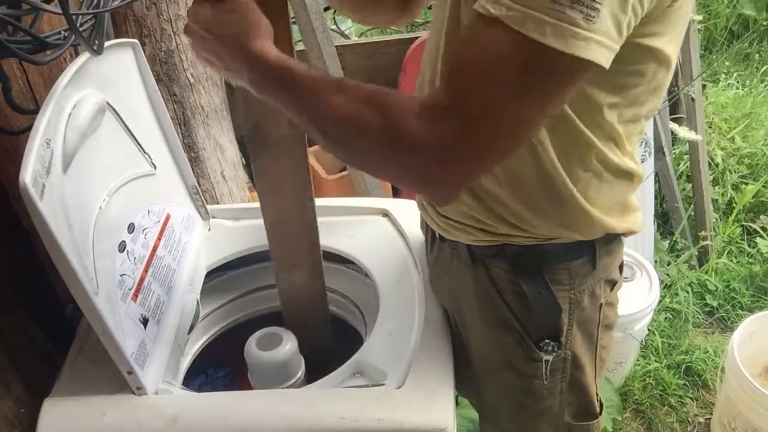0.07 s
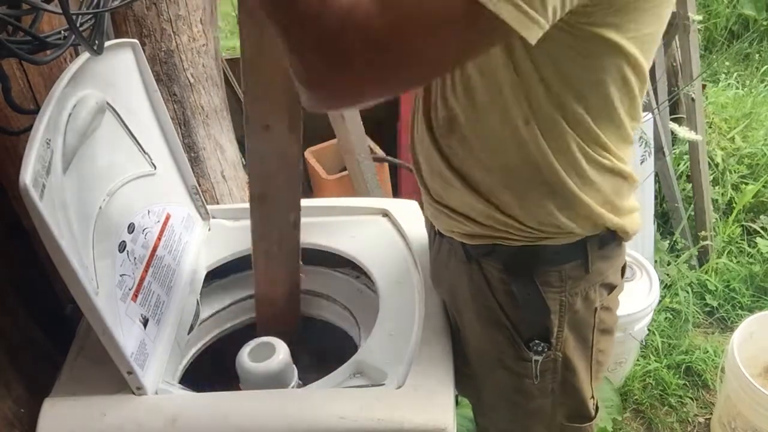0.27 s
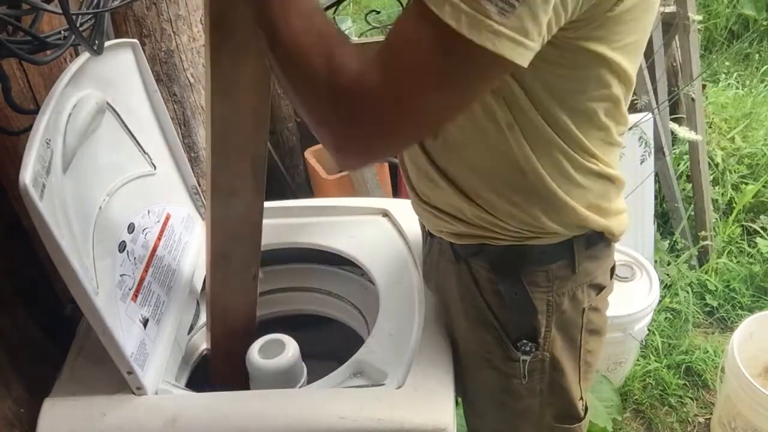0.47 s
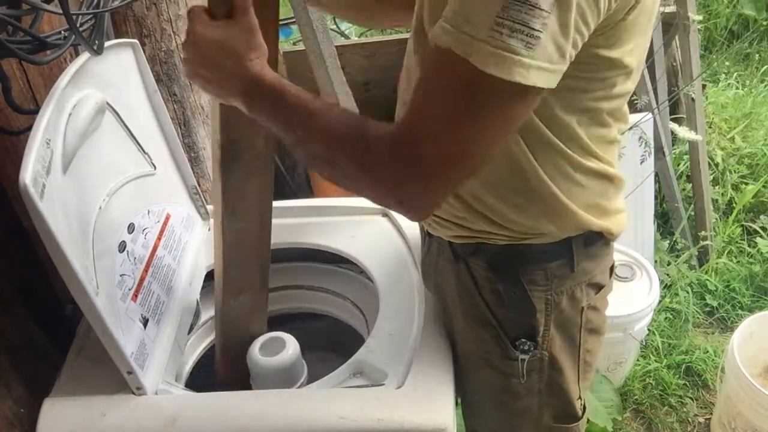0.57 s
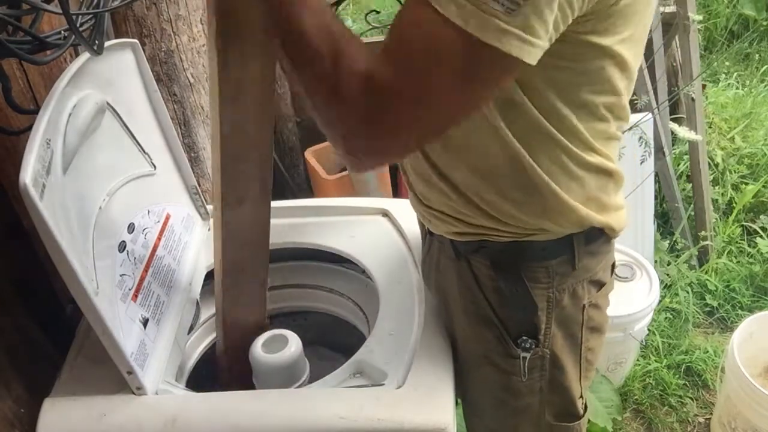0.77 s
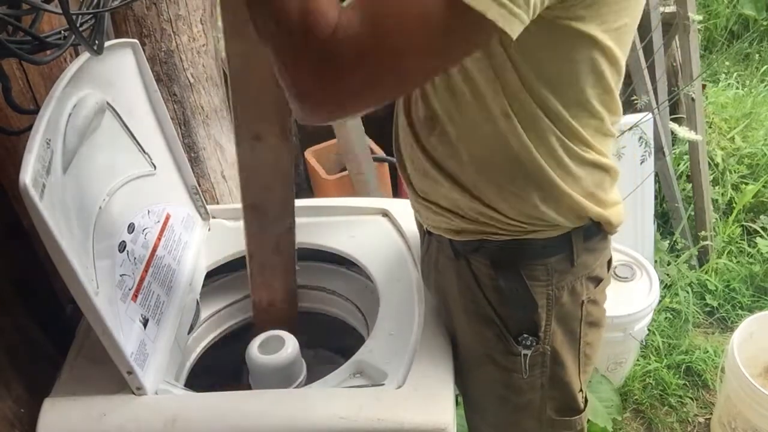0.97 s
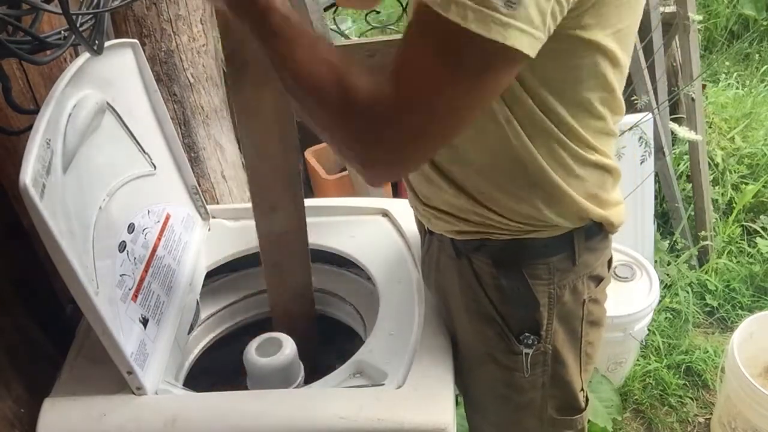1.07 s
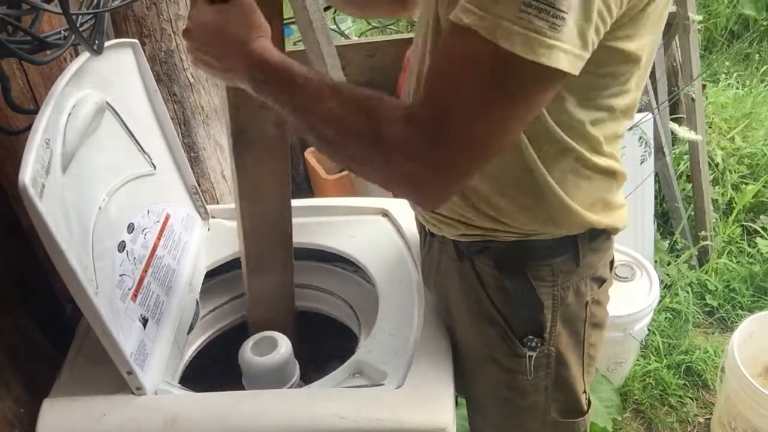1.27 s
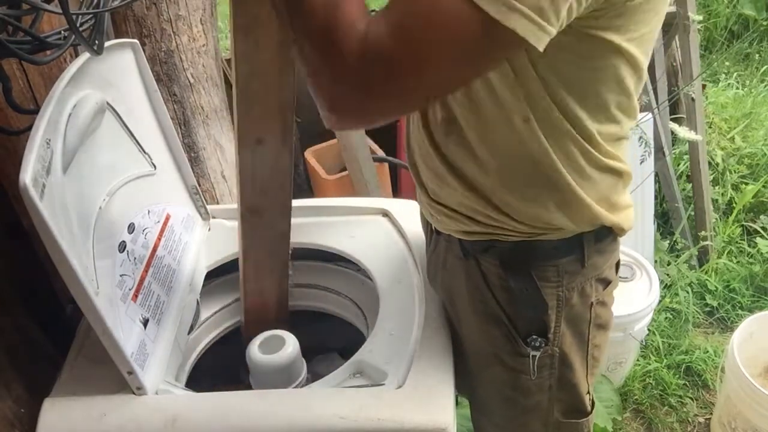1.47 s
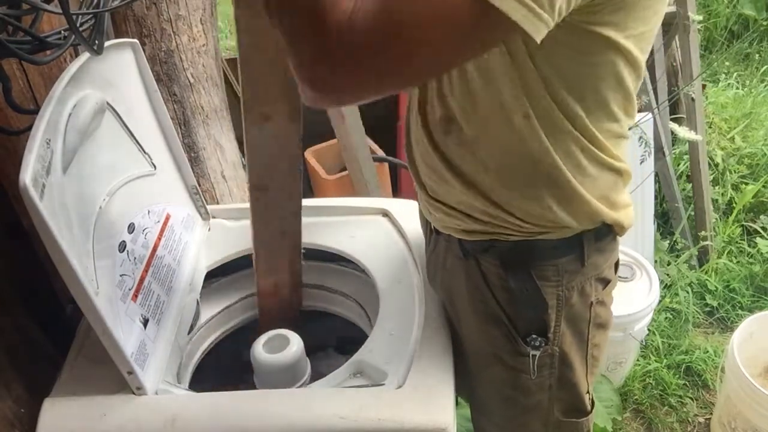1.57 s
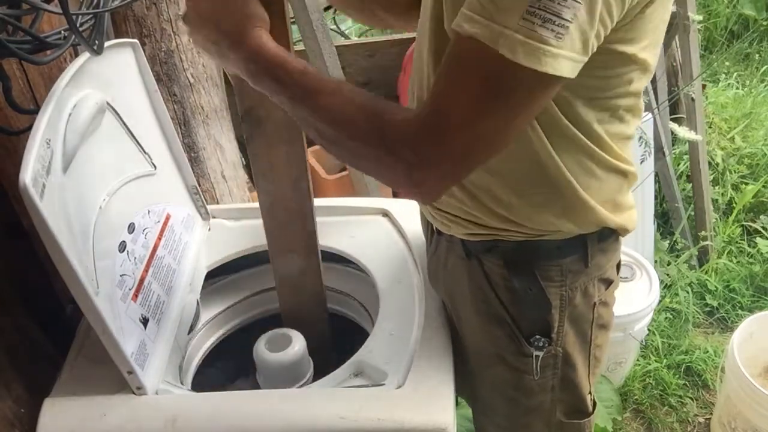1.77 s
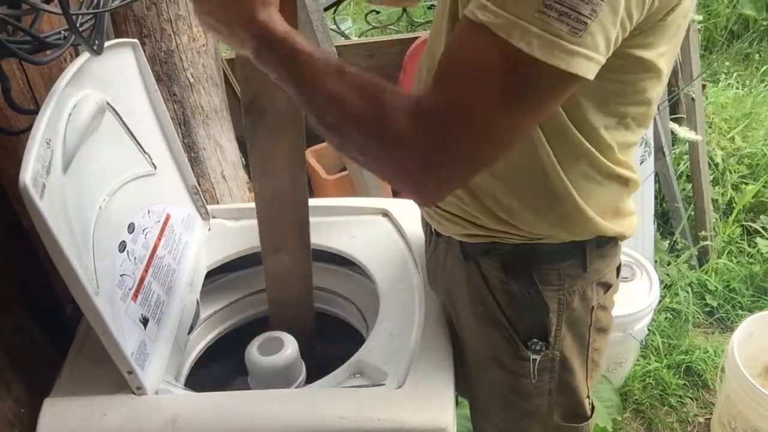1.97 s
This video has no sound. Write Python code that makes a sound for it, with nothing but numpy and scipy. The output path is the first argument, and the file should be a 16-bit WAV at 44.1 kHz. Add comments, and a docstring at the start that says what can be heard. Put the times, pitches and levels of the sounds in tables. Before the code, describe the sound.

Wet laundry sloshes in a washer tub as a wooden board plunges, with sharp clacking knocks

```python
"""A wooden board is plunged through wet laundry in an open top-loading washing machine, outdoors and close by.
Each shove throws a wash of spray: many tiny ringing bubbles plus hiss, coloured and swelled surge by surge.
The clothes thud (low noise) and gulp (short gliding tones); the board clacks on the tub, which rings and echoes.
Far behind, a drawn-out animal call, probably a rooster, is built from harmonics over a quiet yard of faint noise."""
import sys
import numpy as np
from scipy import signal
from scipy.fft import rfft, irfft, next_fast_len
from scipy.io import wavfile
from scipy.ndimage import uniform_filter1d

SR = 44100
rng = np.random.default_rng(int(sys.argv[2]) if len(sys.argv) > 2 else 0)


def to_wav(sig):
    """Store sig (one row per channel, or 1-D mono) as 16-bit WAV at the path in sys.argv[1].

    Samples outside -1..1 are clipped; the rate is SR.
    """
    pcm = np.clip(np.atleast_2d(sig), -1, 1) * 32767
    pcm = np.round(pcm).astype(np.int16)
    wavfile.write(sys.argv[1], SR, pcm.T)  # frames by channels


N = 89258
T = np.arange(N) / SR


def undb(db):
    """Turn decibels into a gain."""
    return 10 ** (np.asarray(db) / 20)


def unit(x):
    """Scale a signal to an average (rms) level of 1."""
    return x / np.sqrt(np.mean(x ** 2))


def fade(t, t60):
    """Die away exponentially, falling 60 dB by t60."""
    return np.exp(-np.log(1000) * t / max(t60, 1e-4))


def wander(seconds):
    """Smooth random drift with spread 1, made by averaging noise twice over the given time."""
    k = max(int(seconds * SR), 2)
    once = uniform_filter1d(rng.standard_normal(N), k)
    return unit(uniform_filter1d(once, k))


TILT_FROM_HZ = 1000
RIPPLE_SPACING_HZ = 112.15  # spacing of the cavity's resonances


def colour(x, points, tilt_db=0, ripple_db=0):
    """Filter by (frequency, gain) points, a treble tilt per octave and random cavity resonances; rms 1."""
    size = next_fast_len(N, real=True)
    bins = np.fft.rfftfreq(size, 1 / SR)
    octave = np.log2(np.maximum(bins, 1))
    hz, db = np.array(points).T
    curve = np.interp(octave, np.log2(hz), db)
    tilt = tilt_db * np.maximum(octave, np.log2(TILT_FROM_HZ))
    steps = rng.standard_normal(size=1024)
    ripple = ripple_db * np.interp(bins / RIPPLE_SPACING_HZ, np.arange(len(steps)), steps)
    shaped = irfft(rfft(x, size) * undb(curve + tilt + ripple), size)
    return unit(shaped[:N])


SURGE_RANGE_DB = 20  # change of level over one rise or one fall


def surge(crest, rise, fall, db):
    """Swell to a crest and die away, in straight lines when drawn in decibels."""
    before = (crest - T) / max(rise, 1e-3)
    after = (T - crest) / max(fall, 1e-3)
    return undb(db - SURGE_RANGE_DB * np.maximum(before, after))


def echoes(x, t60, build):
    """Dense reflections that build up and decay, with about the energy of the input."""
    t = T[:SR // 2]
    tail = rng.standard_normal(len(t)) * fade(t, t60) * (1 - np.exp(-t / build))
    return signal.fftconvolve(x, tail / np.linalg.norm(tail))[:N]


SPRAY_GRAINS_PER_S = 6000
SPRAY_SCATTER_DB = 2  # average boost of a droplet's strength
FIZZ_CYCLES = 7.0  # cycles a droplet rings before it has fallen 30 dB


def droplets(size=400):
    """A steady rain of tiny bursting bubbles of many pitches, most weak and a few strong."""
    count = int(SPRAY_GRAINS_PER_S * N / SR)
    when, pitch, strength = rng.random((count, 3)).T[:, :, None]
    hz = 700 * (13000 / 700) ** pitch  # 700 to 13000 Hz, even in octaves
    boost = np.minimum(-np.log(1 - strength), 4)
    gain = hz * undb(SPRAY_SCATTER_DB * boost)
    t = T[:size]
    grains = gain * np.sin(2 * np.pi * hz * t) * fade(hz * t, 2 * FIZZ_CYCLES)
    places = (when * N).astype(int) + np.arange(size)
    return unit(np.bincount(places.ravel(), grains.ravel(), N)[:N])


HISS_DB = -3.5  # hiss between the droplets, relative to them
TUB_COLOUR_DB = 2.4  # depth of the cavity's resonances, which shift with every surge
# colour of the spray: (frequency [Hz], gain [dB])
SPRAY_COLOUR = [(8, -29.5), (40, -6), (150, -9.5), (450, -2), (850, -8), (1500, 0), (2500, -0.5), (4000, 1),
                (5500, -6), (7500, -15), (11000, -23), (15500, -35)]
# surges of water: (crest time [s], rise [s], fall [s], level [dB], treble tilt [dB per octave])
WATER_SURGES = [(.012, 0.14, 0.071, -57.5, -2), (0.042, 0.14, 0.017, -43, 1.5),
                (0.096, 0.033, 0.078, -39, -.5), (.17, 0.033, 0.054, -55, 1.5),
                (0.242, 0.003, 0.033, -45.5, 1.5), (0.32, 0.0091, 0.041, -51, -2),
                (.352, 0.02, 0.013, -53, -1), (0.423, 0.028, 0.032, -53, -3.5),
                (0.507, 0.0074, 0.029, -52, -5), (.575, 0.0085, 0.033, -26, 2.5),
                (0.605, 0.025, 0.063, -36, 0.8), (.642, 0.018, 0.033, -45, -2.5),
                (0.685, 0.021, 0.062, -29, -0.26), (.71, 0.017, 0.023, -30.5, 1.5),
                (.745, 0.042, 0.048, -39, 4), (0.787, .04, 0.044, -38.5, 1), (0.849, 0.048, 0.75, -66, 2.5),
                (.955, 0.0052, 0.013, -55.5, 0), (1.161, 0.013, 0.05, -41, -0.5),
                (1.195, 0.058, 0.14, -63.5, 12), (1.27, 0.053, 0.056, -47, 0),
                (1.315, 0.073, 0.064, -40, 0), (1.347, 0.038, 0.02, -47.5, -0.5),
                (1.407, 0.066, 0.056, -47.5, -2), (1.435, 0.01, 0.019, -49, 6.5),
                (1.56, 0.021, 0.068, -51, -2.5), (1.64, 0.039, 0.2, -72, 0.5),
                (1.815, 0.012, 0.035, -30, 4.5), (1.833, 0.02, 0.022, -42, 0),
                (1.868, 0.028, 0.046, -38, 1), (1.912, .02, .05, -58.5, -5), (1.948, 0.0065, 0.03, -50, -5),
                (1.97, 0.02, 0.038, -40.5, 1.7), (2.02, 0.059, .08, -58.5, 4.5)]


def sloshes():
    """Each shove drives droplets and a fine hiss of water through the cloth."""
    water = droplets() + undb(HISS_DB) * rng.standard_normal(N)
    out = np.zeros(N)
    for crest, rise, fall, db, tilt in WATER_SURGES:
        out += surge(crest, rise, fall, db) * colour(water, SPRAY_COLOUR, tilt, TUB_COLOUR_DB)
    return out


# colour of the background: (frequency [Hz], gain [dB])
YARD_COLOUR = [(8, -11.5), (25, 4.5), (60, 0.5), (200, -8.5), (500, -1.5), (900, -2.5), (1300, 0),
               (1750, 6), (2500, -4), (5000, -8), (8000, -23), (15500, -28)]
# loudness of the background: (time [s], level [dB])
YARD_LEVELS = [(0, -83), (.3, -60), (0.549, -60.5), (.9, -73), (1.12, -70.5), (1.5, -69.5), (1.62, -63),
               (1.78, -64.5), (2.02, -64)]


def yard():
    """Faint outdoor background: coloured noise that slowly rises and falls."""
    at, db = np.array(YARD_LEVELS).T
    return colour(rng.standard_normal(N), YARD_COLOUR) * undb(np.interp(T, at, db))


# colour of the thuds: (frequency [Hz], gain [dB])
LOAD_COLOUR = [(8, -24.5), (30, 3.5), (60, -0.5), (120, -3.5), (220, -10.5), (400, -12), (900, -15.5),
               (3000, -70.5)]
# low thuds of laundry and trapped air: (crest time [s], rise [s], fall [s], level [dB])
LOAD_THUDS = [(0.137, 0.073, 0.041, -47.5), (0.426, 0.013, 0.047, -58), (0.583, .025, 0.21, -56),
              (0.689, .06, 0.067, -48), (0.779, 0.077, 0.072, -49), (.96, 0.195, 0.9, -72),
              (1.165, 0.014, 0.066, -55.5), (1.32, 0.14, 0.063, -56), (1.38, 0.053, 0.077, -47.5),
              (1.836, 0.059, 0.12, -53), (2.011, 0.05, .1, -50.5)]


def thuds():
    """The wet load heaves with a dull rumble of low noise."""
    rumble = colour(rng.standard_normal(N), LOAD_COLOUR)
    return rumble * sum(surge(*row) for row in LOAD_THUDS)


GLUG_ROUGH, GLUG_ROUGH_S = 0.64, 0.0038  # depth [share] and pace [s] of the tremble in a glug
# glugs of larger air pockets: (start time [s], length [s], middle pitch [Hz], level [dB], glide [octaves per s])
GLUGS = [(0.118, .03, 190, -49, 20), (.764, 0.019, 170, -51, 29.5), (1.217, 0.037, 820, -59, 2),
         (1.357, 0.039, 815, -57, 2), (1.364, 0.026, 170, -45, 24), (1.408, .045, 816, -56.5, -3.5),
         (1.462, 0.036, 830, -60.5, -7.5), (1.519, 0.032, 835, -61, 2)]


def bubbles():
    """Pockets of air glug through the wet cloth, each a short gliding tone."""
    out = np.zeros(N)
    for at, length, hz, db, glide in GLUGS:
        t = np.clip(T - at, 0, length)
        pitch = hz * 2 ** (glide * (t - length / 2))
        phase = 2 * np.pi * np.cumsum(pitch) / SR
        out += undb(db) * np.sin(phase) * np.sin(np.pi * t / length)  # rounded swell
    return out * (1 + GLUG_ROUGH * wander(GLUG_ROUGH_S))


CONTACT_SKIRT_DB, CONTACT_LOW_HZ = -16, 180  # strength of the skirt and where its bass thins out


def contact(hz, octaves, size=4096):
    """The short push of one blow, strongest around hz, with a weaker skirt below."""
    bins = np.maximum(np.fft.rfftfreq(size, 1 / SR), 1)
    away = np.log2(bins / hz)
    peak = np.exp(-.5 * (away / octaves) ** 2)
    skirt = undb(CONTACT_SKIRT_DB) / (1 + 2 ** (2 * away)) * bins / np.hypot(bins, CONTACT_LOW_HZ)
    # fold the cepstrum so the push starts at once, with nothing before the blow
    cepstrum = irfft(np.log(peak + skirt))
    cepstrum[1:size // 2] *= 2
    cepstrum[size // 2 + 1:] = 0
    return irfft(np.exp(rfft(cepstrum)))


RING_DB = -31.5  # ringing relative to the direct blow, before it is halved
WALL_ECHO_S, WALL_ECHO_DB = .0006, -9  # first bounce off the nearby wall of the tub
DRUM_T60_S, DRUM_DB, DRUM_BUILD_S = 0.025, -2, 0.00058  # reflections inside the drum
# what board and tub ring with: (frequency [Hz], relative level [dB], time to fall 60 dB [s])
RINGING_MODES = [(554, -9, 0.041), (990, -41, .025), (1337, -5, 0.075), (1951, 9.5, 0.015),
                 (2823, 2, 0.028), (3294, 3.5, 0.025), (3720, -16, 0.0178), (4010, -15.5, 0.028),
                 (4300, 8.5, .015), (4690, 4, 0.013), (5390, -23, 0.013), (6030, 1.5, 0.021),
                 (6540, 8, 0.016), (7080, -27, 0.015)]
# the board against the tub: (time [s], peak level before drum echoes [dB], centre [Hz], width [octaves])
BOARD_KNOCKS = [(0.239, -29, 2330, 0.74), (.2415, -35.5, 1910, 0.6), (.2450, -31, 2180, 0.6),
                (.3175, -47, 3800, 0.49), (0.504, -46, 2250, 0.65), (0.5715, -6, 5270, 0.17),
                (0.574, -14.5, 2430, 1.3), (0.6816, -19.5, 2620, 0.73), (0.6994, -19, 3870, 0.36),
                (0.707, -22.5, 2900, 0.68), (0.708, -10.5, 2820, 0.4), (.7518, -23.5, 3520, 0.22),
                (1.809, -20, 4950, 0.51), (1.8145, -11, 4980, 0.26), (1.818, -21, 4360, 1.4),
                (1.838, -32.5, 1490, .5), (1.8668, -24.5, 2750, 0.31), (1.9450, -33, 3700, 0.62)]


def knocks():
    """The board cracks against the tub, rings its modes and echoes in the drum."""
    t = T[:SR // 10]
    ring = sum(undb(db) * np.cos(2 * np.pi * hz * t) * fade(t, t60) for hz, db, t60 in RINGING_MODES)
    body = undb(RING_DB) * ring / 2
    body[0] += 1  # the direct blow
    body[int(WALL_ECHO_S * SR)] += undb(WALL_ECHO_DB)
    out = np.zeros(N + SR)
    for at, db, hz, octaves in BOARD_KNOCKS:
        blow = signal.fftconvolve(body, contact(hz, octaves))
        start = int(at * SR)
        out[start:start + len(blow)] += undb(db) * blow / np.abs(blow).max()
    direct = out[:N]
    return direct + undb(DRUM_DB) * echoes(direct, DRUM_T60_S, DRUM_BUILD_S)


CROW_JITTER = 0.0047  # unsteadiness of the pitch [share]
CROW_FLUTTER_DB, CROW_FLUTTER_S = 2.3, 0.021  # flutter of a harmonic at -10 dB, and its pace
CROW_ECHO_DB, YARD_T60_S = -21.5, 0.31  # echoes around the yard
# the distant call: (time [s], pitch [Hz], level [dB])
CALL = [(0.713, 523.7, -62), (.748, 554, -42.5), (0.786, 569.3, -40.5), (.83, 565.3, -47),
        (.916, 545.4, -56), (.965, 547.7, -57.5), (1.033, 550, -62), (1.072, 543, -61.5), (1.105, 514, -87)]
# strength of the call's first harmonics, lowest first: (relative level [dB])
CALL_HARMONICS = [-26, -14.5, -4, -18.5, -20]


def crow():
    """A held, slightly unsteady call, strongest on its third harmonic; the weak harmonics flutter on their way."""
    at, hz, db = np.array(CALL).T
    pitch = np.interp(T, at, hz) * (1 + CROW_JITTER * wander(0.0075))
    phase = 2 * np.pi * np.cumsum(pitch) / SR
    tone = np.zeros(N)
    for number, level in enumerate(CALL_HARMONICS, start=1):
        depth = CROW_FLUTTER_DB * min(abs(level) / 10, 2)  # weaker harmonics flutter more, up to a limit
        tone += undb(level + depth * wander(CROW_FLUTTER_S)) * np.sin(number * phase)
    call = unit(tone) * np.interp(T, at, undb(db), left=0, right=0)
    return call + undb(CROW_ECHO_DB) * echoes(call, YARD_T60_S, .02)


def scene():
    """Water, yard, laundry, board and call at one microphone."""
    return (sloshes() + yard() + thuds() + bubbles() + knocks() + crow())[None]


TOP_HZ = 15900


def record(dry):
    """The recorder cuts the treble steeply above TOP_HZ."""
    return signal.sosfilt(signal.ellip(8, .2, 70, TOP_HZ, fs=SR, output="sos"), dry)


dry = scene()
out = record(dry)
to_wav(out)
```